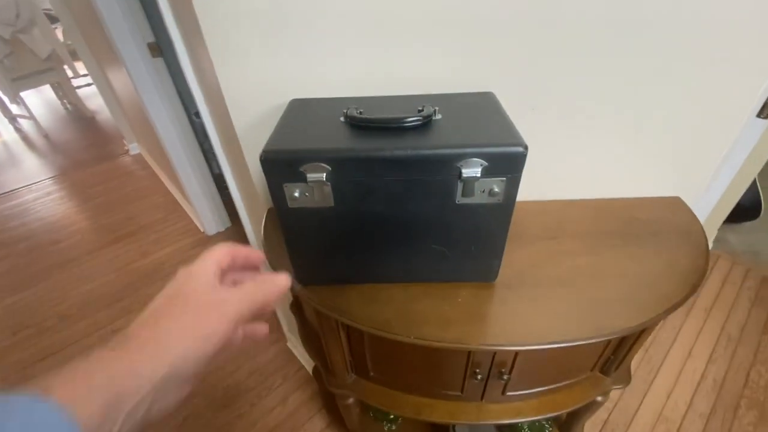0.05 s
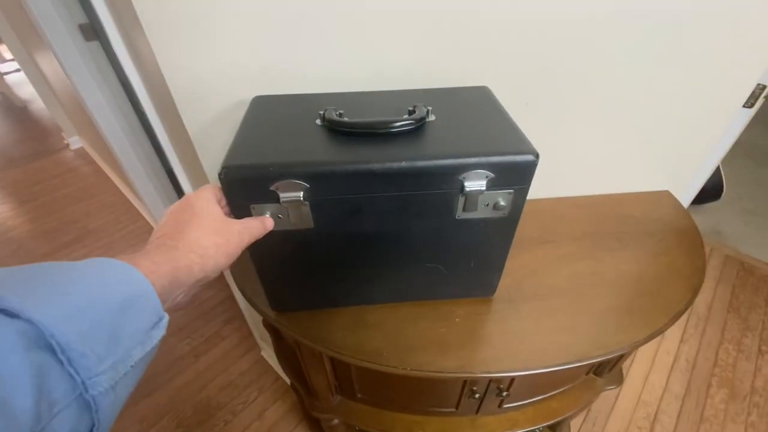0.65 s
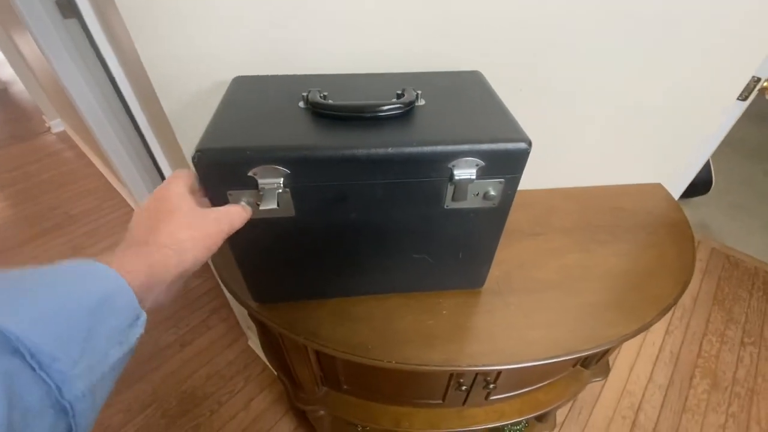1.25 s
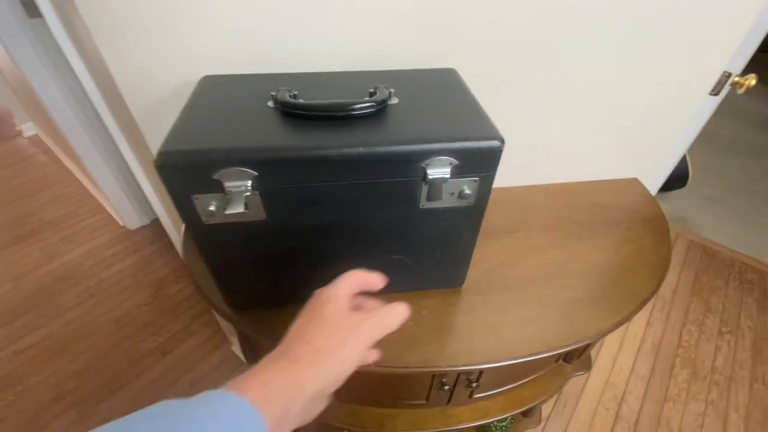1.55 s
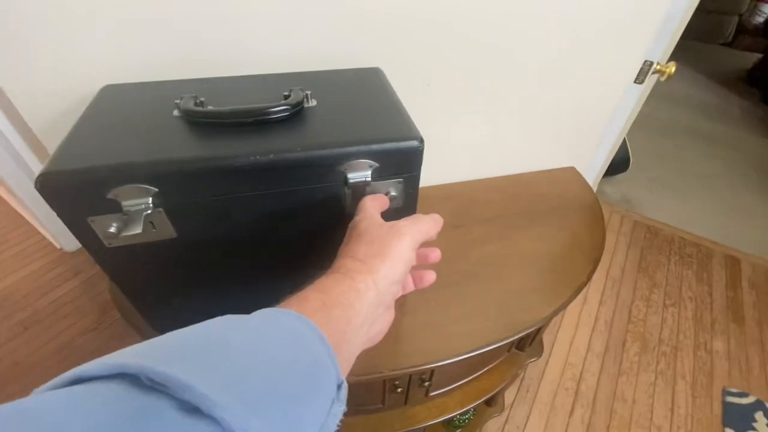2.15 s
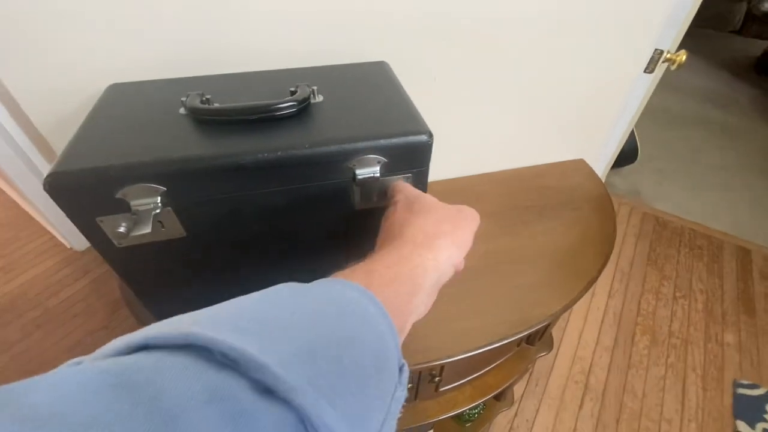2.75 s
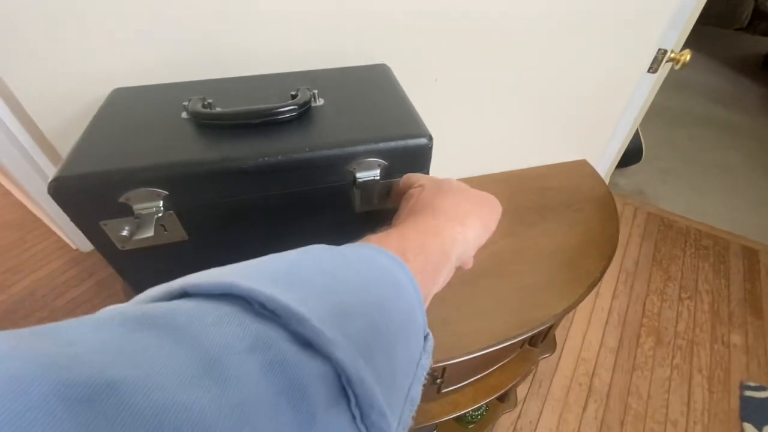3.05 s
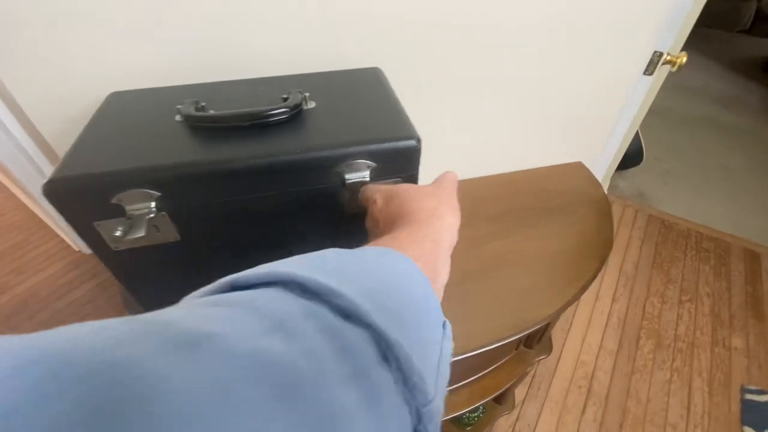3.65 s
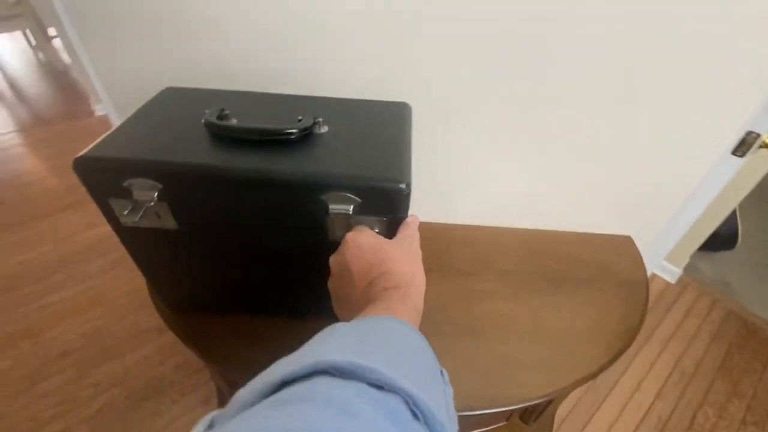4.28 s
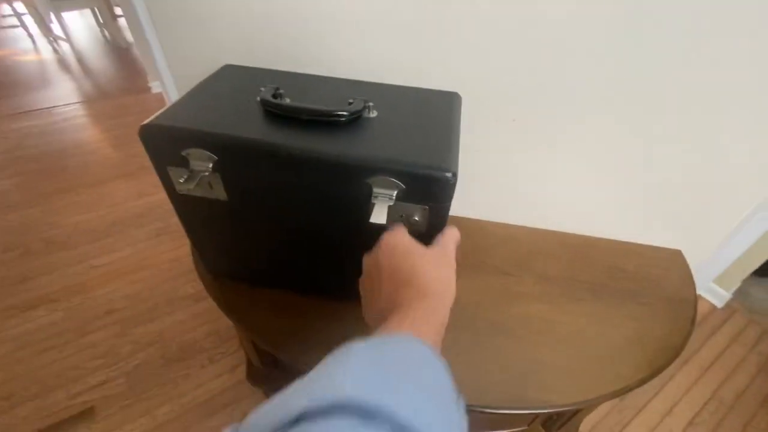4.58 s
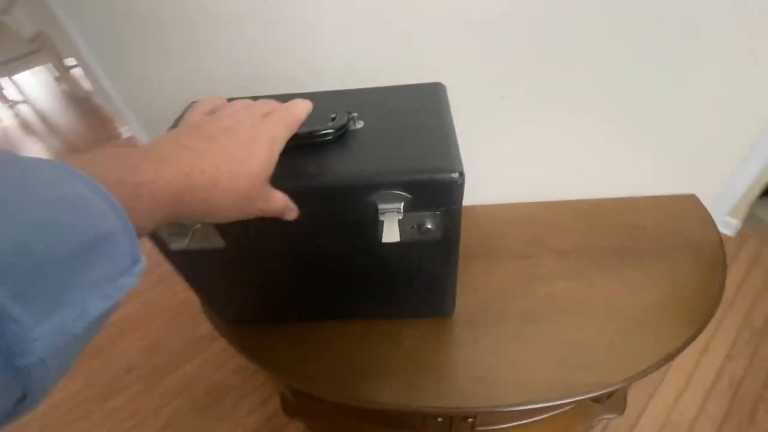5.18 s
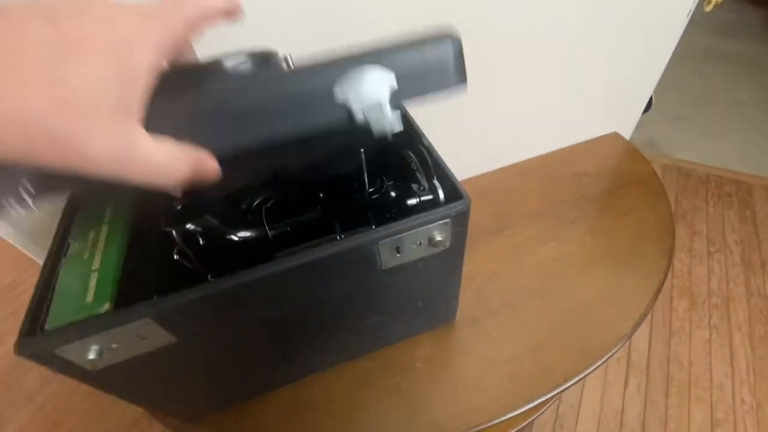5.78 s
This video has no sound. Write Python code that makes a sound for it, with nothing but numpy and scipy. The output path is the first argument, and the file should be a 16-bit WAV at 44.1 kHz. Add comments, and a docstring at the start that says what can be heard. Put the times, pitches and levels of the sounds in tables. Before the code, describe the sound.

Close to a hand-held microphone in a quiet room with some echo, two steel latches on a hard case spring open about three seconds apart. Each sharp metallic snap jolts the case on its wooden table with a low thump and is followed by a smaller click. Soft finger knocks, faint sleeve rustle and a slight rumble fill the gaps. At the end a hand slides over the lid, which comes free with a clack.

```python
"""A sleeve rustles faintly in a quiet, echoing room, close to a hand-held camera that rumbles a little.
A thumb slides each of two sprung steel latches on a hard carrying case: the latch snaps open,
jolts the case on its wooden table, and its hasp (the hinged flap) clicks on the stop.
Fingers bump the shell in between; at the end a palm brushes the lid and pulls it free with a clack."""
import sys
import numpy as np
from scipy import signal
from scipy.fft import rfft, irfft, next_fast_len
from scipy.io import wavfile
from scipy.ndimage import uniform_filter1d, map_coordinates

SR = 44100
rng = np.random.default_rng(int(sys.argv[2]) if len(sys.argv) > 2 else 0)


def dump_mix(stems):
    """Bounce the given channels to the path in sys.argv[1] as a 16-bit WAV at rate SR."""
    frames = np.atleast_2d(stems).T  # one column per channel
    limited = np.clip(frames, -1, 1)  # hard clip at full scale
    pcm = np.round(limited * 32767).astype(np.int16)
    wavfile.write(sys.argv[1], SR, pcm)


N = 261070
T = np.arange(SR * 2 // 3) / SR  # seconds within one blow


def amp(db):
    """Turn decibels into a gain."""
    return 10 ** (np.asarray(db) / 20)


def unit(x):
    """Scale to an average power of 1."""
    return x / np.sqrt(np.mean(np.abs(x) ** 2) + 1e-20)


def blow(x):
    """Give a blow the energy of 4 ms at power 1."""
    return unit(x) * np.sqrt(.004 * SR / x.shape[-1])


def along(points, hz):
    """Read between (Hz, value) points on a log frequency axis."""
    f, v = np.transpose(points)
    return np.interp(np.log(hz + 1), np.log(f + 1), v)


def fade(t, t60):
    """Die away by 60 dB in t60 seconds, the fade time."""
    return np.exp(-np.log(1000) * t / np.maximum(t60, 1e-3))


def swell(start, length, attack, t60):
    """A level that rises until start, holds for length seconds and dies away."""
    t = np.arange(N) / SR - start
    return np.exp(-(np.minimum(t, 0) / attack) ** 2) * fade(np.maximum(t - length, 0), t60)


def wobble(rate):
    """A smooth curve through rate random points a second."""
    points = rng.standard_normal(int(N * rate / SR) + 4)
    return map_coordinates(points, [np.arange(N) * rate / SR])


def filtered(x, response):
    """Multiply each frequency in x by response(Hz)."""
    n = x.shape[-1]
    m = next_fast_len(n + SR // 4)
    return irfft(rfft(x, m) * response(np.fft.rfftfreq(m, 1 / SR)), m)[..., :n]


def resonant(modes, f):
    """The response of a body that rings at certain pitches, its modes."""
    return sum((-1) ** k * amp(db) * 1j * f * width / (hz * hz - f * f + 1j * f * width)
               for k, (hz, width, db) in enumerate(modes))


def add(track, s, sound):
    """Mix a sound into a track at s seconds."""
    part = track[..., round(s * SR):][..., :sound.shape[-1]]
    part += sound[..., :part.shape[-1]]


def diffuse(size):
    """Stereo noise from all sides, a little more alike in the bass than in the treble."""
    # Each row: frequency in Hz, left-right likeness from 0 to 1.
    likeness = [(100, 0.26), (250, 0.25), (600, 0.41), (1200, 0.13)]
    turn = lambda hz: np.arccos(np.clip(along(likeness, hz), -1, 1)) / 2
    noise = rng.standard_normal((2, size))
    mid, side = filtered(noise, lambda hz: np.array([np.cos(turn(hz)), np.sin(turn(hz))]))
    return np.array([mid + side, mid - side])


def rush(spectrum, patchy_db):
    """Stereo noise whose tone colour drifts in patches."""
    slices = signal.stft(diffuse(N), nperseg=512)[2]
    patches = uniform_filter1d(rng.standard_normal(slices.shape[1:]), size=7, axis=0)
    patches = uniform_filter1d(patches, size=24, axis=1)
    noise = signal.istft(slices * amp(patchy_db * unit(patches)), nperseg=512)[1][:, :N]
    return unit(filtered(noise, lambda hz: amp(along(spectrum, hz))))


def room_tail():
    """The room's echo: table and near wall first, then the whole room."""
    # Each row: frequency in Hz, fade time in seconds.
    fade_times = [(80, 0.11), (250, 0.9), (900, 0.57), (2000, 0.46), (4500, 0.48), (8000, 0.43),
                  (11200, 0.43), (13000, 0.14)]
    hz, t, slices = signal.stft(diffuse(len(T)), SR, nperseg=256)
    slices = slices * fade(t, along(fade_times, hz)[:, None])
    tail = signal.istft(slices, SR, nperseg=256)[1][:, :len(T)]
    build_up = 1 - np.exp(-(T / 0.0065) ** 2)
    return unit(tail * build_up * (1 + 0.81 * fade(T, 0.3))) / np.sqrt(len(T))


def in_room(sound, echo_db):
    """A centred sound plus its room echo."""
    return sound + amp(echo_db) * signal.fftconvolve(sound[None], room_tail(), axes=1)[:, :len(T)]


def room_tone(air_db=-66, hum_hz=120, hum_db=-70):
    """Still air and the faint mains hum of an appliance."""
    # Each row: frequency in Hz, relative level in dB.
    air = [(12, -41.5), (20, -15.5), (59, -2), (121, -14), (169, -12.5), (398, -17.5), (540, -21.5),
           (674, -20.5), (1110, -29), (2040, -31.5), (2220, -35), (6720, -35.5), (15000, -61)]
    hum = amp(hum_db) * np.sin(2 * np.pi * hum_hz * np.arange(N) / SR)
    return amp(air_db) * rush(air, patchy_db=4.5) + hum


def sleeve(uneven_db=0.5, grain_db=0.4):
    """The sleeve rubs in uneven strokes as the arm moves, with the fine grain of the weave."""
    # Each row: start in seconds, length in seconds, level in dB.
    strokes = [(0.0, 0.25, -67), (0.31, 0.084, -73.5), (0.506, 0.052, -57.5), (0.764, 0.14, -70.5),
               (1.649, 0.23, -62.5), (2.588, 0.089, -69.5), (2.781, 0.11, -69), (2.95, 0.068, -65.5),
               (3.149, 0.12, -67.5), (3.53, 0.089, -63), (3.64, 0.11, -55.5), (3.792, 0.232, -58),
               (4.148, 0.22, -63.5), (4.864, 0.24, -69), (5.038, 0.032, -55.5), (5.158, 0.2, -65),
               (5.522, 0.11, -60.5), (5.903, 0.05, -63)]
    # Each row: frequency in Hz, relative level in dB.
    cloth = [(100, -8), (300, -2.5), (600, -2), (1000, -1), (2100, -7.5), (3000, -5.5), (3800, -7),
             (4800, -9.5), (7100, -10), (11000, -21), (14000, -48)]
    power = sum((amp(db) * swell(s, length, attack=0.45 * length, t60=0.33)) ** 2
                for s, length, db in strokes)
    roughness = amp(uneven_db * wobble(17) + grain_db * wobble(300))
    return np.sqrt(power) * roughness * rush(cloth, patchy_db=3.6)


def handling(tremor_db=-70, uneven_db=0.3):
    """The hand trembles, and each shift of weight sends a low rumble through the camera."""
    # Each row: peak time in seconds, level in dB.
    shifts = [(0.04, -81.5), (0.539, -49), (1.72, -58.5), (3.16, -60), (3.57, -55.5), (3.83, -49.5),
              (3.97, -54), (4.19, -61.5), (4.71, -51), (5.138, -48.5), (5.3, -51), (5.56, -47),
              (5.72, -46.5)]
    # Each row: frequency in Hz, relative level in dB.
    rumble = [(20, -11), (45, -3), (80, 1), (130, -4.5), (220, -19.5), (400, -22), (900, -47.5)]
    push = amp(tremor_db) + sum(amp(db) * swell(s, 0, attack=0.041, t60=0.75) for s, db in shifts)
    return push * amp(uneven_db * wobble(16)) * rush(rumble, patchy_db=3.0)


def strike(response, t60, rise, spread, echo_db, accent=()):
    """A burst of noise coloured by the struck body, plus its room echo."""
    # spread sets how much left and right differ
    burst = rng.standard_normal(len(T)) + spread * rng.standard_normal((2, len(T)))
    burst = burst * fade(T, t60) * (1 - np.exp(-T / max(rise, 1e-4)))
    right_delay = lambda f: np.exp(-2j * np.pi * f * np.array([[0], [.00022]]))
    direct = filtered(burst, lambda f: response(f) * (1 + resonant(accent, f)) * right_delay(f))
    return blow(direct) + amp(echo_db) * blow(filtered(room_tail(), response))


def contacts(hits, panel_modes, hard_modes, echo_db):
    """Each hit rings the hard parts, ticks in the spring and clacks the panel underneath."""
    # Each row: frequency in Hz, relative level in dB.
    tick_colour = [(3000, -39), (5800, -13), (7000, -5), (8200, -2), (9200, -7), (9800, -9.5),
                   (11600, -14.5), (12800, -27), (15200, -30.5), (16500, -43)]
    out = np.zeros((2, N))
    # heavy parts cannot follow the fastest motion
    mass = lambda f, corner_hz: 1 / (1 + 1j * f / corner_hz) ** 2
    plate = lambda f: resonant(hard_modes, f) * mass(f, 21000)
    spring = lambda f: amp(along(tick_colour, f))
    panel = lambda f: resonant(panel_modes, f) * mass(f, 5000)
    for s, db, clack_db, tick_db, ring_hz, tick_hz, t60 in hits:
        # the spot that is hit brings out one pitch of the plate and one of the spring
        ring = strike(plate, t60, rise=0.0044, spread=1.0, echo_db=echo_db, accent=[(ring_hz, 220, 6)])
        tick = strike(spring, 2.0 * t60, rise=.0006, spread=0.95, echo_db=echo_db - 7,
                      accent=[(tick_hz, 260, 8)])
        clack = strike(panel, 2.1 * t60, rise=0.00045, spread=0.24, echo_db=echo_db)
        add(out, s, amp(db) * (ring + amp(tick_db) * tick + amp(clack_db) * clack))
    return out


def latches():
    """Each bolt lets go in a few quick slips; the hasp flies out, hits its stop and bounces."""
    # Each row: start in seconds, ring level in dB, clack and tick in dB above the ring,
    # ring and tick pitches in Hz, the ring's fade time in seconds.
    left_hits = [(0.0985, -61, 3, -9, 3250, 8270, 0.012), (1.0559, -34.5, -4.5, -7, 2870, 7400, 0.026),
                 (1.069, -17, -13.5, -5, 2721, 7350, 0.013), (1.0758, -15.5, 0, -0.5, 2445, 8150, 0.014),
                 (1.096, -22, -0.5, -6.5, 3750, 8345, 0.021), (1.1199, -22, 9.5, -19, 2701, 8095, 0.033),
                 (1.256, -20, -5.5, -6, 4250, 6590, 0.016), (1.286, -30.5, -3.5, -17, 5070, 6464, 0.025)]
    right_hits = [(1.8315, -62, 13.5, -3, 2216, 7320, 0.023), (1.8502, -42, -1.5, -8, 2687, 6850, 0.014),
                  (2.2981, -72, -5, -19, 2705, 6920, 0.026), (3.9402, -49, 7.5, -5, 2140, 8010, 0.023),
                  (3.97, -55, 2.5, -2, 2400, 8300, 0.018), (4.2735, -43, 2, -8, 4700, 7360, 0.05),
                  (4.2805, -28, 2.5, -7.5, 4500, 7230, 0.032), (4.2898, -13, -2.5, -6.5, 3120, 8290, 0.022),
                  (4.2931, -14.5, -0.5, -2.5, 4560, 9000, 0.021),
                  (4.2975, -16, -4.5, -11, 4280, 7050, 0.015), (4.355, -19.5, 7, -10.5, 2350, 8500, 0.009),
                  (4.5179, -26, -2.5, -3.5, 3160, 8430, 0.017),
                  (4.5492, -35.5, -7.5, -3, 3900, 6850, 0.067)]
    # How each latch and the panel under it ring. Each row: pitch in Hz, width in Hz, level in dB.
    left_steel = [(1764, 150, 0.5), (2370, 200, 0), (2730, 130, 0.5), (3040, 150, -1), (3860, 270, -2.5),
                  (4430, 300, -4), (5050, 590, -8), (6680, 450, -5.5)]
    right_steel = [(1983, 100, -1.5), (2383, 150, 2.5), (2730, 240, 0.5), (2970, 260, 0.5),
                   (3680, 470, -4.5), (4170, 370, -1.5), (4800, 400, -1.5), (5530, 810, -7),
                   (5730, 490, -2), (6690, 1000, -7)]
    left_panel = [(502, 57, -4), (795, 66, -6), (921, 42, 0), (1050, 82, -1), (1195, 130, -7),
                  (1510, 160, -7.5)]
    right_panel = [(523, 50, -3.5), (766.4, 70, -2), (918, 47, 3), (1010, 130, -1), (1270, 110, -1.5),
                   (1442, 78, -1), (1770, 370, -6)]
    left = contacts(left_hits, left_panel, left_steel, echo_db=-3.5)
    right = contacts(right_hits, right_panel, right_steel, echo_db=-4.5)
    return left + right


def touches():
    """Fingers, palm and lid bump the shell: it bends with a falling thud, and skin scuffs the cover."""
    # Each row: start in seconds, thud level in dB, scuff in dB above the thud,
    # a pitch in Hz that the thud falls through, its fade time in seconds.
    bumps = [(0.291, -57, -9, 400, 0.038), (0.486, -42.5, -7.5, 330, 0.097), (0.522, -39, -13.5, 176, 0.14),
             (0.564, -44, -13, 258.7, 0.039), (1.593, -47, 10, 279.6, 0.39), (1.623, -41, 4.5, 372.4, 0.27),
             (1.855, -41, -0.5, 219.7, 0.11), (3.178, -54, -4, 261, 0.098), (3.539, -51.5, -6.5, 244, 0.14),
             (3.809, -50, -6, 179, 0.092), (3.947, -42, -1.5, 212, 0.16), (4.585, -54, -3, 316, 0.044),
             (4.674, -44, -9, 229, 0.12), (5.096, -49.5, -4, 203.3, 0.068), (5.219, -39, -8, 246, 0.17),
             (5.274, -42, 2.5, 196.5, 0.16), (5.503, -33.5, -15, 228.6, 0.036),
             (5.549, -47.5, 5, 222, 0.44), (5.697, -35, -9.5, 242, 0.177), (5.767, -23, -6, 218.3, 0.09)]
    # Each row: frequency in Hz, relative level in dB.
    scuff_colour = [(60, -7), (200, 6.5), (450, 8), (700, 7), (1200, 2.5), (2500, -9.5), (6000, -31.5),
                    (12000, -42.5)]
    covering = lambda f: amp(along(scuff_colour, f))
    out = np.zeros((2, N))
    for s, db, scuff_db, hz, t60 in bumps:
        pitch = hz * (0.83 + 1.4 * np.exp(-T / 0.0042))
        tone = np.sin(2 * np.pi * np.cumsum(pitch) / SR)
        thud = blow(tone * fade(T, t60) * (1 - np.exp(-T / 0.0059)))
        scuff = strike(covering, 1.35 * t60, rise=0.00026, spread=1.0, echo_db=1.5)
        add(out, s, amp(db) * (in_room(thud, echo_db=-6.5) + amp(scuff_db) * scuff))
    return out


def jolts():
    """The spring's kick rocks the case on the table and sets both booming."""
    # Each row: start in seconds, level in dB, favoured pitch in Hz.
    kicks = [(1.063, -28.5, 205), (1.0792, -22, 294.1), (1.0867, -12.5, 204.6), (1.0966, -12.5, 213.7),
             (1.124, -22.5, 238.4), (4.302, -13.5, 292.6), (4.311, -17.5, 292), (4.322, -20.5, 207),
             (4.357, -20, 292)]
    # How case and table ring. Each row: pitch in Hz, level in dB, fade time in seconds.
    case_modes = [(78.6, -19.5, 0.61), (101, -6.5, 0.11), (132, -8, 0.38), (188, -5.5, 0.18),
                  (207, -4.5, 0.15), (243, -9, 0.11), (298, -4, 0.095), (334.8, -12, 0.055),
                  (410, -21, 0.17), (537.5, -11, 0.15), (817, -20, 0.19)]
    out = np.zeros((2, N))
    hz, level, t60 = np.transpose(case_modes)[:, :, None]
    for s, db, main_hz in kicks:
        # the corner that lands favours the modes near one pitch
        gain = amp(level + 1.6 * np.exp(-((hz - main_hz) / 30) ** 2) + rng.normal(0, 1, hz.shape))
        swing = np.sum(gain / hz * fade(T, t60) * np.sin(2 * np.pi * hz * T), axis=0)
        # the first swing is the widest; the air follows its speed
        swing = swing * (1 + 3.8 * fade(T, 0.037)) * (1 - np.exp(-T / 0.0036))
        boom = blow(np.gradient(swing))
        add(out, s, in_room(amp(db) * boom, echo_db=-11))
    return out


def lid():
    """The hand grips the lid, which knocks on its seat and then pulls free."""
    # Each row: start in seconds, ring level in dB, clack and tick in dB above the ring,
    # ring and tick pitches in Hz, the ring's fade time in seconds.
    hits = [(5.028, -49, -1.5, -17, 2370, 8160, 0.029), (5.0544, -47.5, -15, -8.5, 2380, 8400, 0.023),
            (5.2785, -41.5, 8.5, -27, 2440, 8230, 0.008), (5.7636, -21.5, 5.5, -22, 2690, 8560, 0.0116),
            (5.791, -32.5, 3, -23, 2110, 8700, 0.02)]
    # How the lid's panel and rim ring. Each row: pitch in Hz, width in Hz, level in dB.
    panel = [(520, 95, -8), (769, 52, -14), (973, 63.7, 3.5), (1100, 56, 0), (1296, 145, -0.5),
             (1594, 72, -3)]
    rim = [(1840, 360, 1.5), (2770, 410, 1), (4000, 300, 0), (5570, 1800, -11), (6730, 120, -5)]
    return contacts(hits, panel, rim, echo_db=-6.5)


def palm():
    """Skin slides over the lid's covering in short, thin swishes."""
    # Each row: peak time in seconds, level in dB, half length in seconds.
    swishes = [(5.244, -57.5, 0.043), (5.488, -61, 0.044), (5.92, -60, 0.024)]
    # Each row: frequency in Hz, relative level in dB.
    skin = [(1500, -17), (5000, -5), (7500, 1.5), (10000, -4.5), (13000, -28)]
    t = np.arange(N) / SR
    level = sum(amp(db) * np.exp(-((t - s) / width) ** 2) for s, db, width in swishes)
    return level * rush(skin, patchy_db=6.5)


def scene():
    """All the sounds together, in stereo."""
    return latches() + lid() + jolts() + touches() + palm() + sleeve() + handling() + room_tone()


def record(dry, top_hz=16300):
    """The microphone hears more bass on the right, rounds off peaks and cuts the highest treble."""
    # Its weak deep bass and high treble. Each row: frequency in Hz, gain in dB.
    microphone = [(20, -11.5), (40, -3), (65, 2.5), (11500, -0.5), (13000, -8.5), (16000, -8.5)]
    # Each row: frequency in Hz, left minus right in dB.
    balance = [(40, -4.5), (120, -8), (270, -11), (520, 1), (1500, -0.5), (5000, 2.5), (8300, -3.5),
               (12000, -11)]
    sides = np.array([[.5], [-.5]])
    coloured = filtered(dry, lambda hz: amp(along(microphone, hz) + along(balance, hz) * sides))
    rounded = coloured / (1 + coloured ** 6) ** (1 / 6)
    return filtered(rounded, lambda hz: hz < top_hz)


dry = scene()
out = record(dry)
dump_mix(out)
```